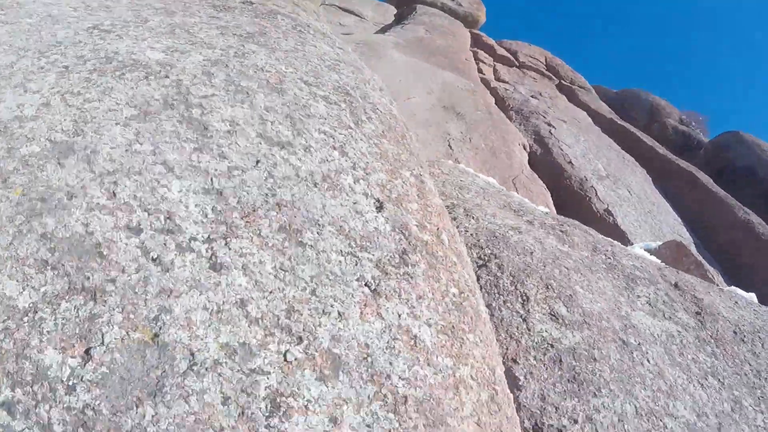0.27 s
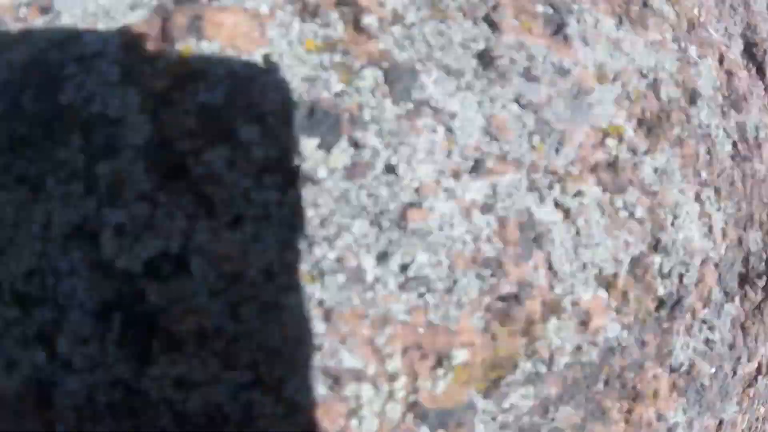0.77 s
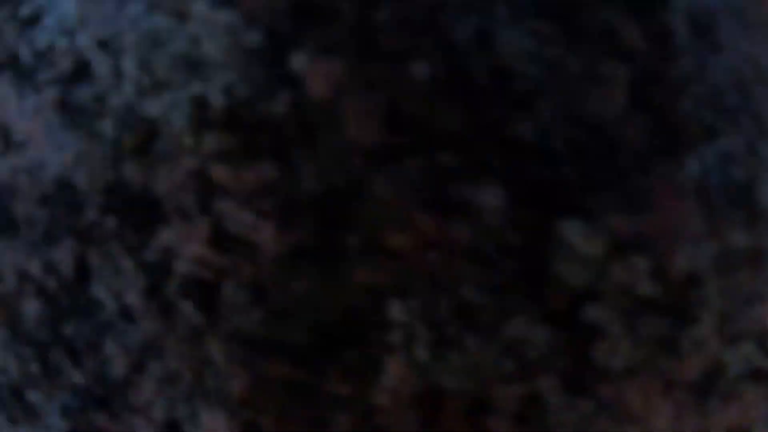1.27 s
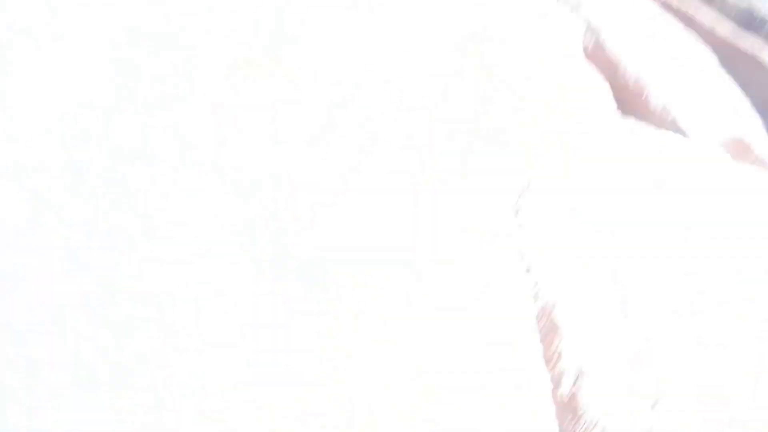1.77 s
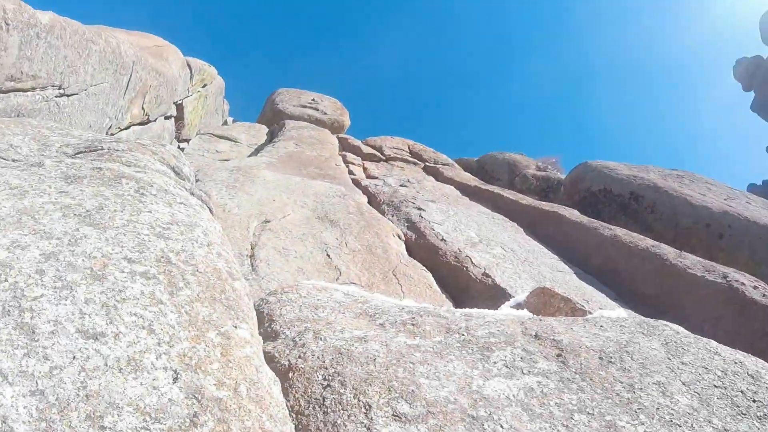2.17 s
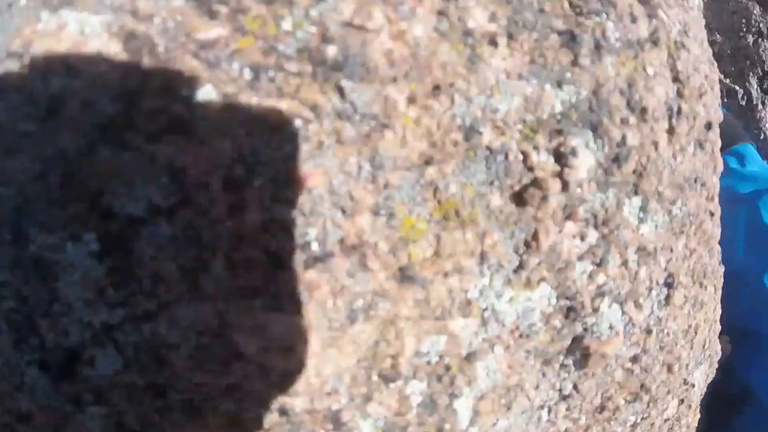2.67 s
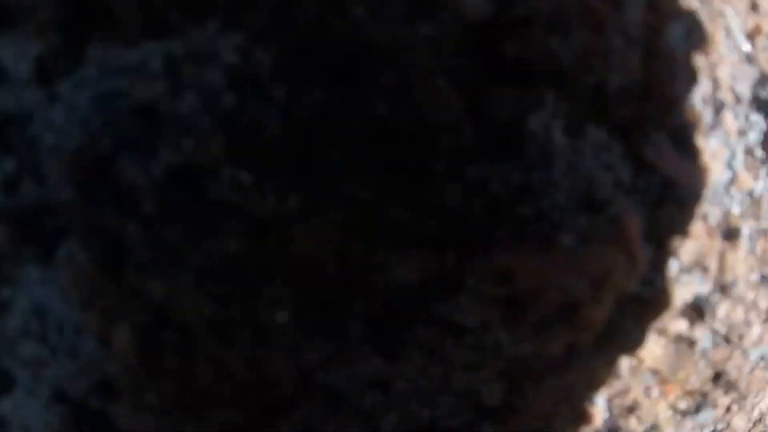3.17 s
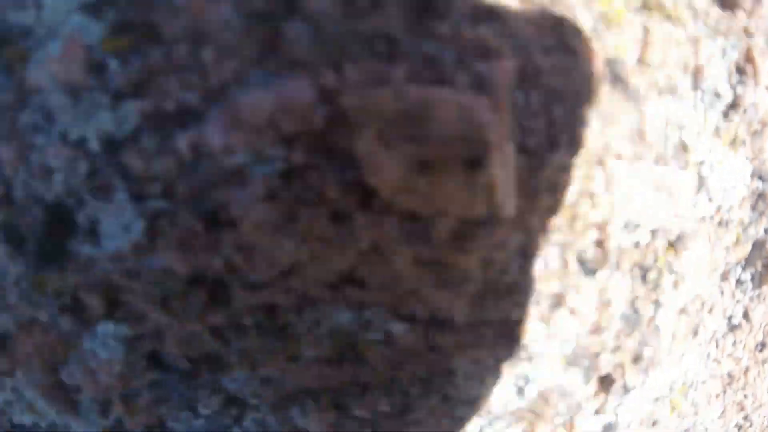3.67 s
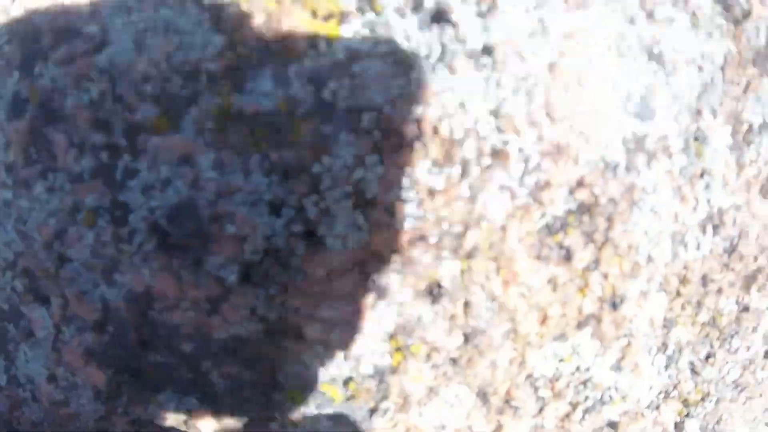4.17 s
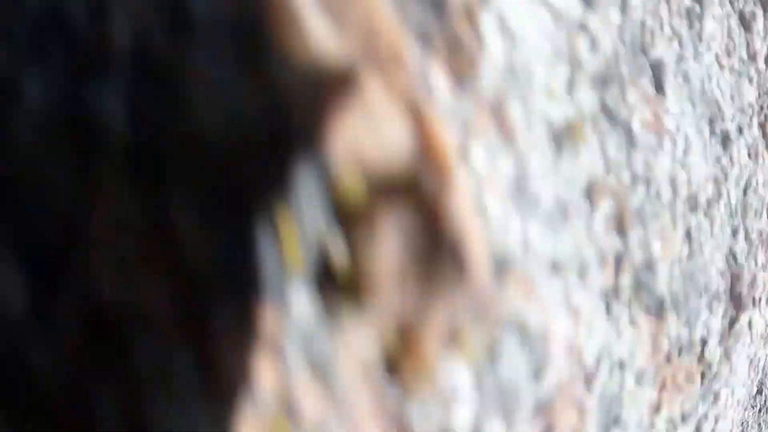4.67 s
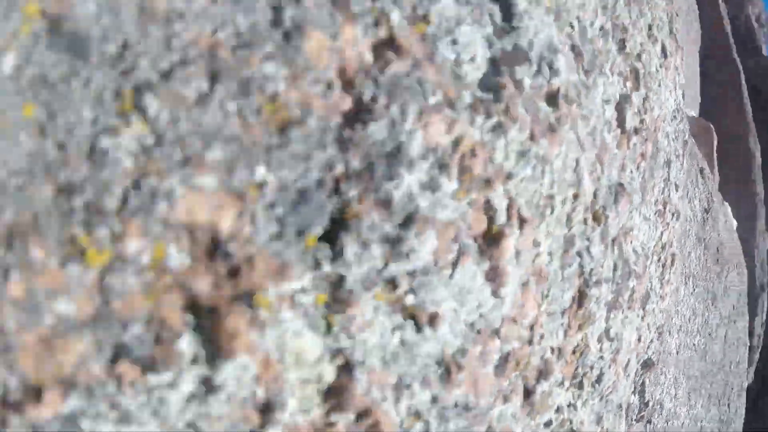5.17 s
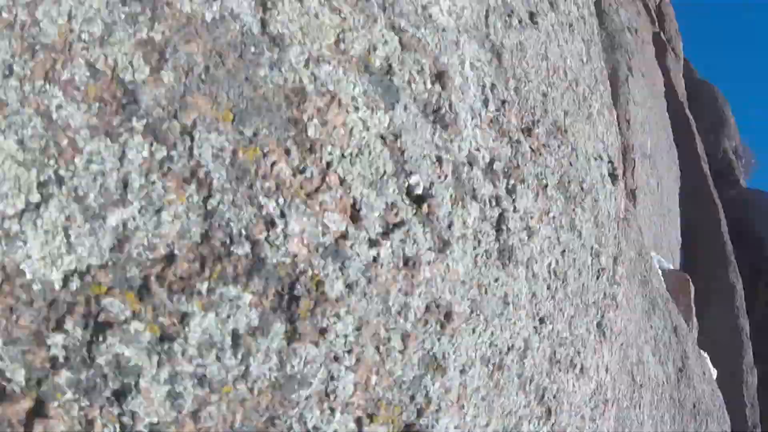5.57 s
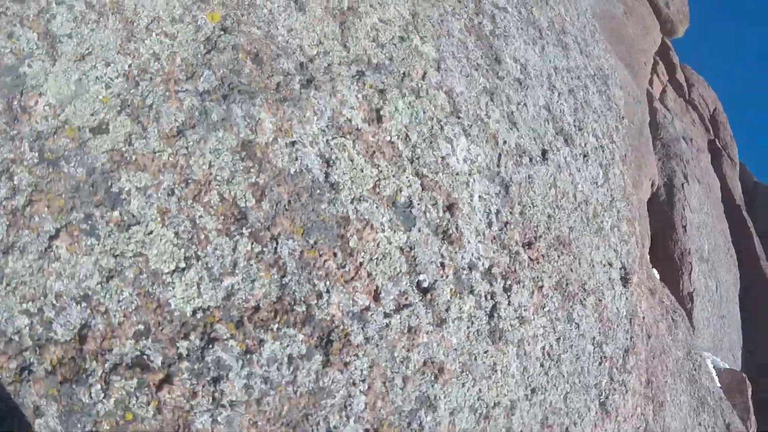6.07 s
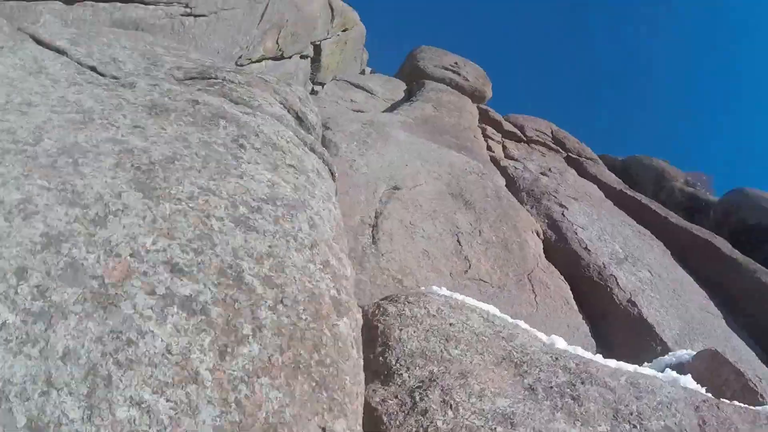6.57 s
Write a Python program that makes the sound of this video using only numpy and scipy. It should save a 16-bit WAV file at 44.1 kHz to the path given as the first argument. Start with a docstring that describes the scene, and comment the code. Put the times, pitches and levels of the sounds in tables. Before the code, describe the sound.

A mono, boxed-in sound, very close, from a hard case on a climber's helmet. Subsonic-feeling wind pumps slowly throughout with a soft flutter and quiet hiss. Faint cloth rubs pass at 0.6-1.0 s. At 1.49 s a hard, sharp knock hits, leaving a faint metallic ring and tiny bumps until 1.65; the hiss drops, then creeps back. Soft rustles come at 2.4-2.6. At 3.34 a hollow thump leads into a gritty scrape of about 0.1 s. Wind swells around 4.0. Metal gear clicks at 4.55 and 4.62. From 4.86 to 4.95 comes the heaviest cluster: rapid bangs, helmet boom, bright crunching scrape and thin ringing. Smaller bumps and a duller drag follow at 5.2-5.37, with a clink. A clear metal click sounds at 5.68, light rustling at 6.05-6.3, another click at 6.43, then wind to 6.8.

```python
"""Wind pumps slowly on the microphone of a helmet camera, in a closed case on a climber in a rock crack.
The case knocks and scrapes on the rock, exciting its resonances, the helmet and a ringing metal part.
Metal gear clicks as short bursts of modes on the rack, and cloth rustles as grainy filtered noise.
A gain control cuts the level at loud knocks, holds, and lets the ducked hiss creep back."""
import sys
import numpy as np
from scipy import signal
from scipy.fft import rfft, irfft, next_fast_len
from scipy.io import wavfile
from scipy.ndimage import uniform_filter1d, minimum_filter1d, map_coordinates

SR = 44100
rng = np.random.default_rng(int(sys.argv[2]) if len(sys.argv) > 2 else 0)


def bounce(signal):
    """Save signal as a 16-bit WAV file at the path given by the first command-line argument."""
    frames = np.transpose(np.atleast_2d(signal))
    limited = np.clip(frames, -1, 1)
    pcm = np.round(limited * 32767).astype(np.int16)
    wavfile.write(sys.argv[1], SR, pcm)


def volts_from_db(level):
    """Convert decibel levels to linear amplitude ratios."""
    exponent = np.asarray(level, float) / 20
    return 10 ** exponent


N = 300321

# low resonances of the closed case: (frequency [Hz], bandwidth [Hz], relative level [dB])
CASE_MODES = [(46.2, 60, 1), (188.5, 140, -1.5), (340, 180, -5.5), (630, 90, -4.5), (970, 100, -21.5)]


def unit(x):
    """Normalisation: scales a signal to rms 1."""
    return x / np.sqrt(np.mean(x ** 2) + 1e-20)


def curve(rows):
    """Linear interpolation in dB: one level per sample from (time, level) rows, silent outside them."""
    times, levels = np.transpose(rows)
    return np.interp(np.arange(N) / SR, times, levels, left=-200, right=-200)


def wobble(rate):
    """Band-limited fluctuation: a smooth spline through random knots, rate of them a second."""
    knots = rng.standard_normal(int(N * rate / SR) + 4)
    return map_coordinates(knots, [np.arange(N) * rate / SR])


def filtered(x, response):
    """Linear filtering: the spectrum of x times a complex response of frequency."""
    m = next_fast_len(N + SR // 2)
    return irfft(rfft(x, m) * response(np.fft.rfftfreq(m, 1 / SR)), m)[:N]


def noise(spectrum):
    """Spectral shaping: white noise coloured by (frequency [Hz], relative density [dB]) rows, at rms 1."""
    f, db = np.transpose(spectrum)

    def colour(hz):
        return volts_from_db(np.interp(np.log(hz + 1), np.log(f + 1), db, left=-120, right=-120))

    return unit(filtered(rng.standard_normal(N), colour))


def body(modes):
    """Modal superposition: causal second-order resonances summed with alternating sign."""
    def response(f):
        return sum((-1) ** k * volts_from_db(db) * 1j * f * width / (centre ** 2 - f ** 2 + 1j * f * width)
                   for k, (centre, width, db) in enumerate(modes))
    return response


def grit(spread_db, rate, top_hz):
    """Granular excitation: uneven noise grains through the shell; softer contact carries less treble."""
    # upper resonances of the shell: (frequency [Hz], bandwidth [Hz], relative level [dB])
    shell_modes = [(590, 440, -6.5), (1336, 190, 0), (2190, 360, 0), (2890, 200, -1.5), (3230, 660, -5.5),
                   (5670, 2300, -12), (6950, 500, -13)]
    grains = rng.standard_normal(N) * volts_from_db(spread_db * wobble(rate))
    resonate = body(shell_modes)
    return unit(filtered(grains, lambda f: resonate(f) / (1 + 1j * f / top_hz) ** 3))


def add(track, s, sound):
    """Superposition: mixes a sound into a track at time s."""
    track[round(s * SR):][:len(sound)] += sound


def ring(modes, t):
    """Free vibration: modes decay exponentially, each at a random strength and phase."""
    return sum(volts_from_db(db + rng.normal(0, 1.7) - 60 * t / t60) * np.sin(2 * np.pi * (hz * t + rng.random()))
               for hz, db, t60 in modes)


def contacts():
    """Impact: all blows as (time, force dB, contact ms, direction, crack dB, boom gain)."""
    # knocks of the case on rock: (time [s], relative force [dB], contact [ms],
    # direction [in -1, out 1], relative crack level [dB])
    case_knocks = [(1.4818, -22, 1.8, -1, -24), (1.4832, -15, 3.5, 1, -19), (1.4863, 4, .95, -1, 2),
                   (1.4869, -2.5, 3.2, 1, -14), (1.4895, 0, .7, -1, -16), (1.5452, -21, 2.6, -1, -36),
                   (1.549, -17, 2.5, 1, -40), (1.5635, -20, 2.5, -1, -36), (1.574, -21, 2.5, 1, -38),
                   (1.591, -23, 2.5, 1, -42), (3.219, -37.5, 2.5, -1, -64.5), (3.334, -34, 1.1, -1, -40),
                   (3.3396, 0, 1.3, -1, -12), (3.3406, 2, 3.4, 1, -6), (3.342, -3, 6, 1, -27.5),
                   (3.35, -4, 7, -1, -30), (3.369, -14, 2.5, 1, -25), (3.376, -14, 2.2, -1, -25),
                   (3.403, -14, 2, 1, -25), (3.4065, -14, 2, -1, -25), (3.4245, -24, 1.4, -1, -12),
                   (4.0685, -35, 1.06, -1, -55), (4.8685, -1, 7, 1, -15), (4.8765, -9, 3.5, -1, -12),
                   (4.881, -9, 3.5, 1, -25), (4.8988, -2, 4.5, 1, -20), (4.906, -7, 4, 1, -12),
                   (5.275, -13, 4.5, 1, -30), (5.2395, -25, 2.5, -1, -20), (5.248, -37, 2, -1, -26)]
    # bumps that also catch the helmet, all inward: (time [s], relative force [dB], contact [ms],
    # relative crack level [dB], relative helmet boom [dB])
    helmet_bumps = [(1.65, -20.5, 4.7, -46, -26.5), (1.895, -31.5, 6.5, -50, -29.5),
                    (4.8593, -6.5, 6.4, -38, -35), (4.8842, -4, 2.6, -4, -8), (4.8898, -4, 2.8, -12, -8),
                    (4.8968, -2, 2.6, -6, -6), (4.9034, -1, 2.6, -3, -3), (4.9163, -4.5, 0.53, 13, 3),
                    (5.2076, -19, 2.13, -21.5, -12), (5.22, -14, 11, -28.5, -26),
                    (5.263, -6, 5.7, -28, -25), (5.2724, -15.5, 1.7, -19.5, -27),
                    (5.2795, -16, 3.4, 2, -34), (5.2859, -11.5, 1.4, -7, 1), (5.345, -8, 7, -22, -30)]
    return ([(s, db, ms, way, crack_db, 0) for s, db, ms, way, crack_db in case_knocks]
            + [(s, db, ms, -1, crack_db, volts_from_db(boom_db)) for s, db, ms, crack_db, boom_db in helmet_bumps])


def knocks():
    """Impulsive excitation: a short push shakes the case, booms in the helmet, cracks through the shell."""
    # helmet resonances: (frequency [Hz], relative level [dB], t60 [s])
    helmet_modes = [(117.3, -1, 0.15), (147, -4.5, 0.065)]
    push, crack, thud, booms = np.zeros((4, N))
    t = np.arange(SR // 2) / SR
    early = t[:SR // 20]
    burst = volts_from_db(-60 * early / 0.013) * (1 - np.exp(-early / 0.0026))  # t60 13 ms, rise 2.6 ms
    boom = sum(volts_from_db(db - 60 * t / t60) * np.sin(2 * np.pi * hz * t) for hz, db, t60 in helmet_modes)
    boom = (1 - np.exp(-t / 0.002)) * boom  # the helmet springs back against the push
    for s, db, ms, way, crack_db, boom_gain in contacts():
        force = np.sin(np.pi * np.minimum(t[:SR // 50] * 1000 / ms, 1)) ** 2
        add(push, s, way * volts_from_db(db) * force)
        dulled = boom_gain and ms > 3  # the helmet dulls cracks of long contact
        add(thud if dulled else crack, s, volts_from_db(crack_db) * burst)
        add(booms, s, boom_gain * boom)
    direct = filtered(push, lambda f: 1j * f / (25 + 1j * f))  # the push itself reaches the microphone
    shaken = filtered(push, body(CASE_MODES))
    bright = crack * grit(spread_db=1.0, rate=300, top_hz=7300)
    dull = thud * grit(spread_db=-0.5, rate=590, top_hz=2760)
    return 1.286 * direct + 0.48 * shaken + bright + dull + booms


def metal():
    """Modal ringing: one metal part on the case, set off by blows and drags, vibrates freely."""
    # modes of the part: (frequency [Hz], relative level [dB], t60 [s])
    part_modes = [(1776, 0, .39), (1823, -8, .3), (2213, -14, .32), (2417, -21, .25), (2659, -7, .16)]
    # starts of ringing: (time [s], level of the first mode before random spread [dB],
    # brightness [dB per octave])
    ring_starts = [(1.489, -29.5, 1), (3.4, -38, 11), (4.918, -29, 13), (5.34, -49, 10)]
    out, t = np.zeros(N), np.arange(SR // 2) / SR
    lowest_hz = part_modes[0][0]
    for s, db, tilt_db in ring_starts:
        excited = [(hz, db + level + tilt_db * np.log2(hz / lowest_hz), t60) for hz, level, t60 in part_modes]
        add(out, s, ring(excited, t))
    return out


def scrapes():
    """Frictional excitation: grains hiss in the shell and slip; the uneven drag shakes the case."""
    # case dragged over rock, one list a drag: (time [s], relative grit level [dB])
    drag_levels = [
        [(1.492, -33), (1.507, -55), (1.54, -52), (1.57, -42), (1.6, -51), (1.625, -66)],
        [(3.344, -32.5), (3.37, -26), (3.4, -29), (3.427, -24), (3.432, -42), (3.45, -85)],
        [(4.861, -31), (4.874, -25), (4.895, -33), (4.912, -20), (4.924, -22.5), (4.943, -22), (4.947, -36),
         (4.965, -46), (5.0, -53)],
        [(5.202, -39.5), (5.24, -53.5), (5.278, -24), (5.29, -24), (5.305, -34), (5.354, -28), (5.37, -62)],
    ]
    # each drag: (rumble over grit at the start [dB], its loss [dB per s], share of soft contact [0-1])
    drag_kinds = [(21, 4.5, 0.3), (10, 153, 0), (11, 29, 0), (7.5, 87, 1)]
    # sharp crystals cut along the case: (time [s], length [s], relative level [dB], loss [dB per s])
    crystal_cuts = [(1.486, 0.014, -34, 2001.5), (3.35, 0.085, -44.5, 255.5), (4.895, 0.017, -44, 48.5),
                    (4.9165, 0.0044, -14.5, 901.5), (4.92, 0.018, -31.5, 146)]
    # sharp grains, straight through: (frequency [Hz], relative density [dB])
    crystal_colour = [(5000, -20.5), (8500, -5.5), (10500, -10.5), (13000, -4.5), (14300, -14),
                      (14900, -51)]
    # soft contact favours the middle of the shell: (frequency [Hz], bandwidth [Hz], relative level [dB])
    worn_modes = [(2240, 2200, 0)]
    shudder_db, shudder_t60 = -20, 0.05  # the case rattles on after a push: dB re force, s

    t = np.arange(N) / SR
    strokes = np.zeros((4, N))
    hard_stroke, edge_stroke, rumble_stroke, soft_stroke = strokes
    for rows, (over_db, loss_db, soft) in zip(drag_levels, drag_kinds):
        level_db = curve(rows)
        hard_stroke += np.sqrt(1 - soft) * volts_from_db(level_db)
        soft_stroke += np.sqrt(soft) * volts_from_db(level_db)
        elapsed = np.clip(t - rows[0][0], 0, 0.5)
        rumble_stroke += volts_from_db(level_db + over_db - loss_db * elapsed)
    for s, length, db, loss_db in crystal_cuts:
        add(edge_stroke, s, volts_from_db(db - loss_db * t[:round(length * SR)]))
    for s, db, *_ in contacts():
        add(rumble_stroke, s, volts_from_db(db + shudder_db - 60 * t[:SR // 5] / shudder_t60))
    # contact builds in 3 ms
    hard_gain, edge_gain, rumble_gain, soft_gain = uniform_filter1d(strokes, SR // 300, axis=1)

    rumble = unit(filtered(noise([(20, 2.5), (300, -1.5), (800, -20), (2200, -29)]), body(CASE_MODES)))
    slips = unit(volts_from_db(2 * wobble(140)))
    hard = grit(spread_db=1.0, rate=630, top_hz=6000)
    worn = unit(filtered(grit(spread_db=4.0, rate=530, top_hz=4430), body(worn_modes)))
    hiss = slips * (hard_gain * hard + soft_gain * worn)
    return hiss + edge_gain * noise(crystal_colour) + rumble_gain * rumble


def gear():
    """Damped modal impact: click modes peak in phase 2.2 ms in and die fast; hanging pieces ring on."""
    # gear clicks: (time [s], relative level [dB], brightness [dB per octave])
    gear_clicks = [(2.442, -53, 36.5), (3.243, -39, -11), (3.6826, -42.5, 26.5), (4.5466, -24, -1),
                   (4.6233, -25, 0), (5.221, -24.5, 6), (5.3946, -40.5, -14), (5.6833, -15.5, 1.5),
                   (5.9046, -52.5, -23), (6.4254, -19, 3)]
    # modes of the gear: (frequency [Hz], bandwidth [Hz], relative level [dB])
    gear_modes = [(1337, 51, -0.5), (2050, 1100, 5.5), (2690, 120, 8.5), (3320, 110, -8), (3930, 99, -12.5),
                  (4400, 170, -22), (5000, 300, -14.5), (5800, 170, -25)]
    # free-hanging pieces: (time [s], frequency [Hz], level before random spread [dB], t60 [s])
    chimes = [(5.12, 3360, -60, 0.1), (5.176, 3350, -55.5, 0.17), (6.066, 2800, -63, 0.6)]
    peak_s, settle_s = 0.0022, 0.008  # time of the peak; damping as the pieces come to rest
    chatter_gain, chatter_t60 = 3, 0.035  # bare contact: factor, s

    out, t = np.zeros(N), np.arange(SR // 20) / SR
    late = t - peak_s
    swell = np.clip(t / peak_s, 0, 1) * np.exp(-(late / settle_s) ** 2)
    for s, db, tilt_db in gear_clicks:
        click = np.zeros(len(t))
        for hz, width, level in gear_modes:
            mode_db = level + tilt_db * np.log2(hz / 2670) + rng.normal(0, 1)
            decay = np.exp(-np.pi * width * np.maximum(late, 0))
            click += volts_from_db(mode_db) * np.cos(2 * np.pi * hz * late) * decay
        chatter = np.diff(rng.standard_normal(len(t) + 1)) * volts_from_db(-60 * t / chatter_t60)
        chatter = chatter_gain * uniform_filter1d(uniform_filter1d(chatter, size=8), size=6)
        add(out, s - 0.001, volts_from_db(db - 19.5) * swell * (click + chatter))
    for s, *mode in chimes:
        add(out, s, ring([mode], np.arange(SR // 2) / SR))
    return out


def rustles():
    """Fibre friction: each rub of cloth or rope swells and fades; crisp fibre is brighter than soft."""
    # rubs: (time [s], length [s], level [dB], share of crisp fibre [0-1])
    rubs = [(0.62, 0.056, -64, .8), (0.676, 0.078, -62, .8), (0.884, 0.14, -59.5, 0.73),
            (1.643, 0.013, -51, .7), (1.68, 0.043, -61, .1), (1.851, 0.074, -66, 0.3),
            (2.367, 0.098, -55.5, .7), (2.524, 0.072, -54.5, 0.53), (2.613, 0.034, -59.5, 0.35),
            (4.05, 0.1, -58.5, 0.52), (4.425, 0.063, -68, 0.67), (6.045, 0.058, -57.5, .6),
            (6.11, 0.22, -64.5, .2), (6.305, 0.039, -57.5, 1)]
    crisp_gain, soft_gain = np.zeros((2, N))
    for s, length, db, crisp in rubs:
        rub = volts_from_db(db) * np.hanning(round(length * SR)) ** 0.25
        add(crisp_gain, s, np.sqrt(crisp) * rub)
        add(soft_gain, s, np.sqrt(1 - crisp) * rub)
    crisp_fibre = grit(spread_db=2.5, rate=910, top_hz=8000)
    soft_fibre = grit(spread_db=2.5, rate=300, top_hz=3000)
    return crisp_gain * crisp_fibre + soft_gain * soft_fibre


def wind():
    """Turbulent pressure: slow pumping on the microphone with a faster gusty flutter above it."""
    # strength of the slow pumping: (time [s], level [dB])
    pump_levels = [(0.0, -16.5), (0.74, -27.5), (1.14, -29), (1.54, -24), (2.26, -34.5), (2.58, -25),
                   (3.05, -20.5), (3.4, -22), (3.64, -29), (3.88, -20.5), (4.0, -12), (4.25, -17),
                   (4.5, -30), (5.0, -24), (5.55, -22), (5.8, -17), (6.2, -29.5), (6.81, -18)]
    # faster flutter of the air on the case: (time [s], level [dB])
    flutter_levels = [(0, -43.5), (.5, -48), (.95, -47), (1.3, -50.5), (1.8, -52.5), (2.2, -59.5),
                      (2.45, -42), (2.65, -49.5), (3, -49), (3.7, -45.5), (3.95, -41.5), (4.15, -43),
                      (4.5, -49), (5.6, -45), (6.05, -48), (6.3, -45.5), (6.81, -49)]
    # colours of the two: (frequency [Hz], relative density [dB])
    pump_colour = [(4, -27), (9, -12), (13, 17), (22, -9.5), (33, -14), (45, -33), (70, -73)]
    flutter_colour = [(25, -7.5), (38, 4), (60, -1), (110, -7.5), (220, -18), (600, -27), (1200, -37.5)]
    flutter = unit(noise(flutter_colour) * volts_from_db(2 * wobble(5) + 2.5 * wobble(23)))
    return volts_from_db(curve(pump_levels)) * noise(pump_colour) + volts_from_db(curve(flutter_levels)) * flutter


def scene():
    """Superposition: the sum of all sources, as one channel."""
    return (knocks() + metal() + scrapes() + gear() + rustles() + wind())[None]


def preamp_hiss():
    """Electronic noise: a steady coloured hiss with a slight wobble in level."""
    # colour of the hiss: (frequency [Hz], relative density [dB])
    hiss_colour = [(180, -28.5), (300, 0), (636, -9.5), (714, -9.5), (1840, -8.5), (4600, -17.5),
                   (5080, -17.5), (11100, -29.5), (12700, -38), (14900, -64)]
    return volts_from_db(-62.5) * noise(hiss_colour) * volts_from_db(0.2 * wobble(26))


def gain_control(x):
    """Dynamic compression: a quick cut at loud sounds, a hold, then a steady climb back."""
    threshold_db, deepest_db, climb_db_per_s = -7.5, -13, 18
    hold_s, lag_s = 0.22, 0.015
    level_db = 20 * np.log10(np.abs(uniform_filter1d(np.abs(x), SR // 1000)) + 1e-9)
    hold = round(hold_s * SR) // 2 * 2
    need_db = np.clip(threshold_db - level_db, deepest_db, 0)
    need_db = minimum_filter1d(need_db, hold + 1, origin=hold // 2)
    need_db[0] = -10.0  # still recovering from an earlier knock
    climb = climb_db_per_s * np.arange(N) / SR
    gain_db = climb + np.minimum.accumulate(need_db - climb)
    lag = round(lag_s * SR) // 2 * 2
    gain_db = uniform_filter1d(gain_db, lag + 1, origin=lag // 2)  # the cut arrives a little late
    return x * volts_from_db(gain_db)


def low_pass(x):
    """Removes everything above the highest recorded frequency."""
    return signal.sosfilt(signal.butter(12, 15090, fs=SR, output="sos"), x)


def record(dry):
    """Recording chain: preamp hiss, gain control, then saturation that rounds peaks near full scale."""
    x = gain_control(dry[0] + preamp_hiss())
    x = x / (1 + np.abs(x) ** 12) ** (1 / 12)
    return low_pass(x[None])


dry = scene()
out = record(dry)
bounce(out)
```